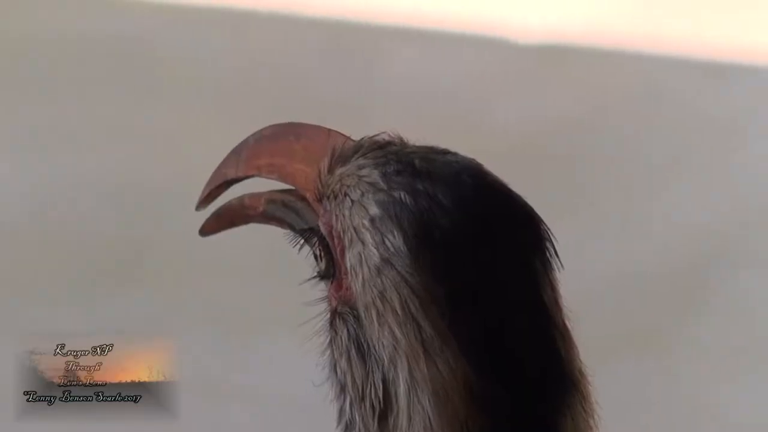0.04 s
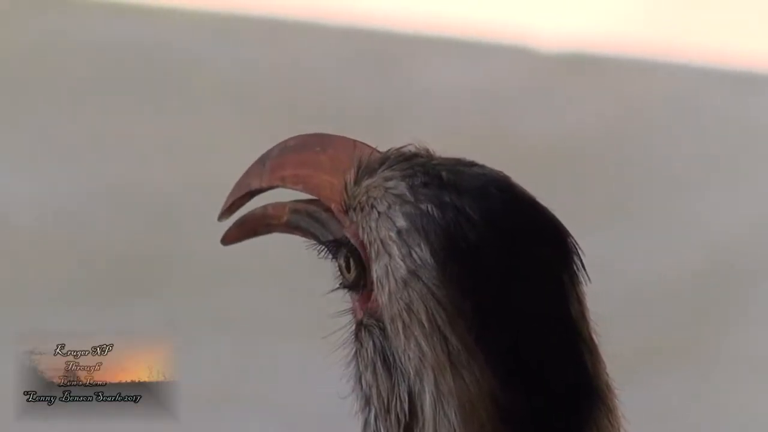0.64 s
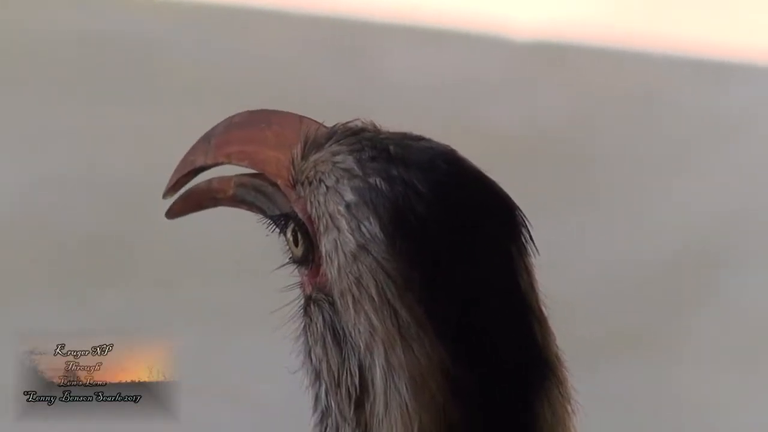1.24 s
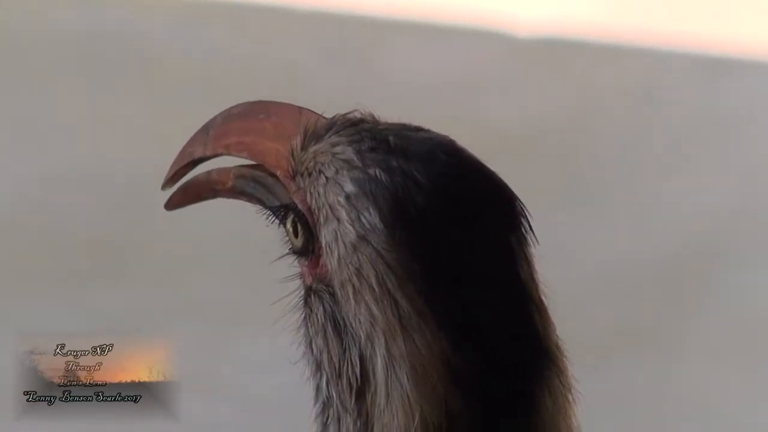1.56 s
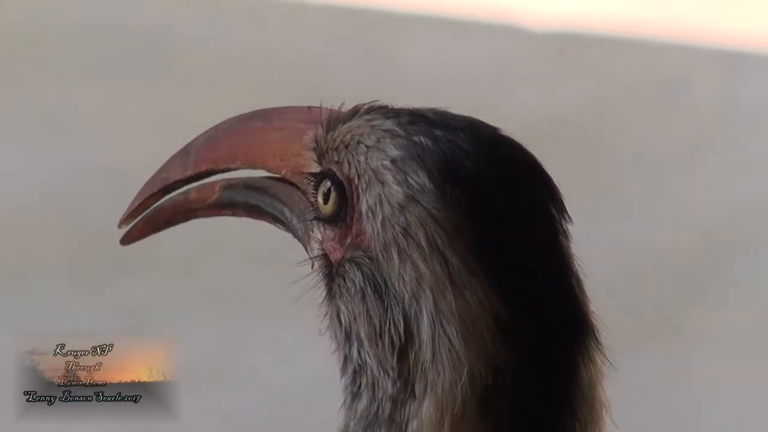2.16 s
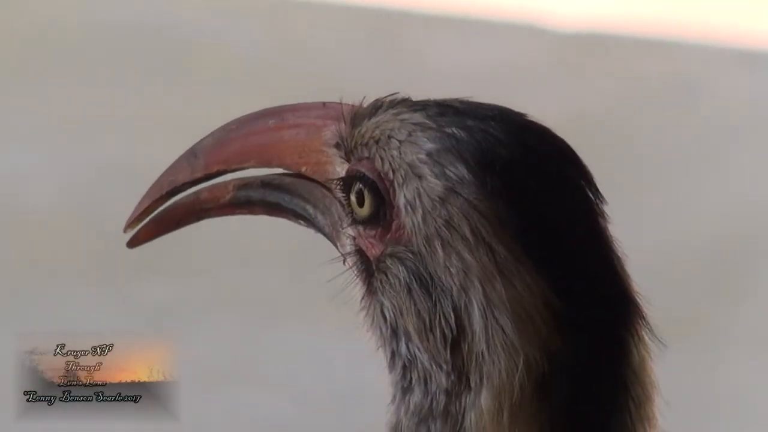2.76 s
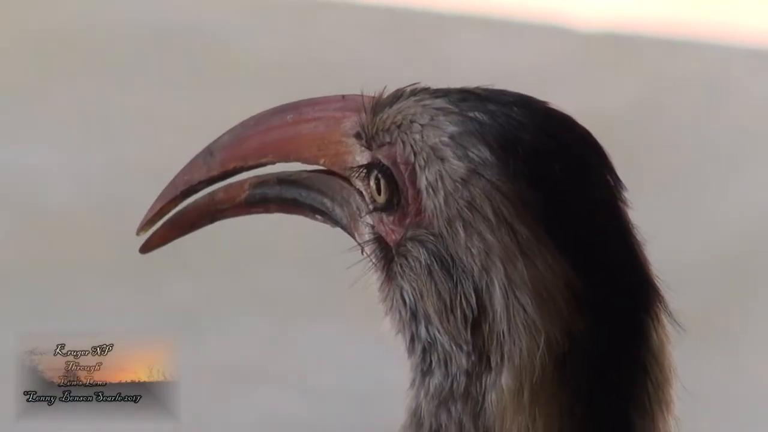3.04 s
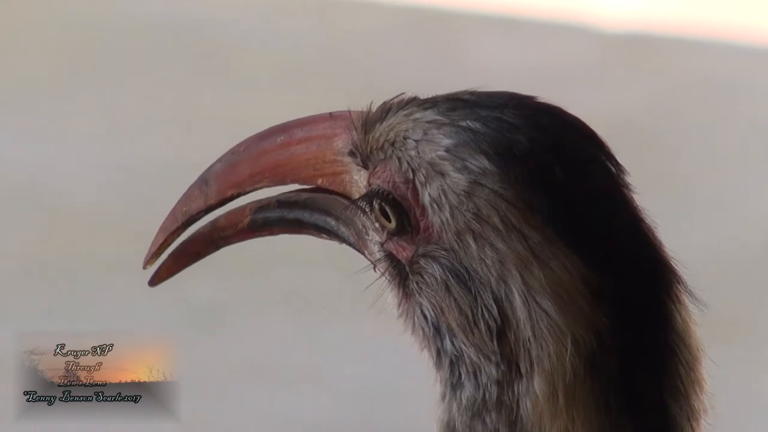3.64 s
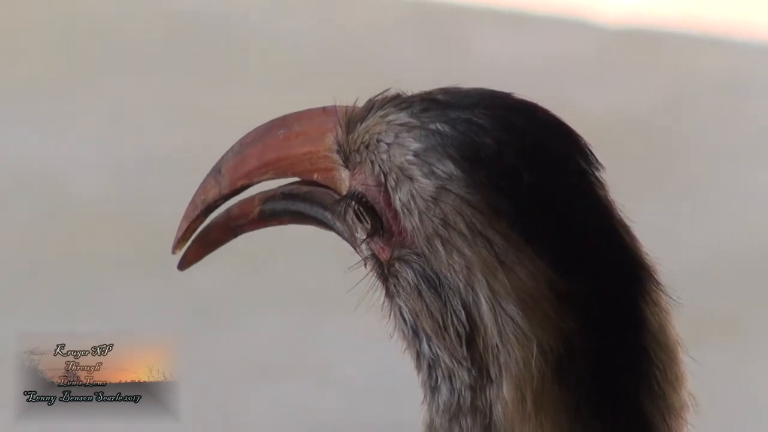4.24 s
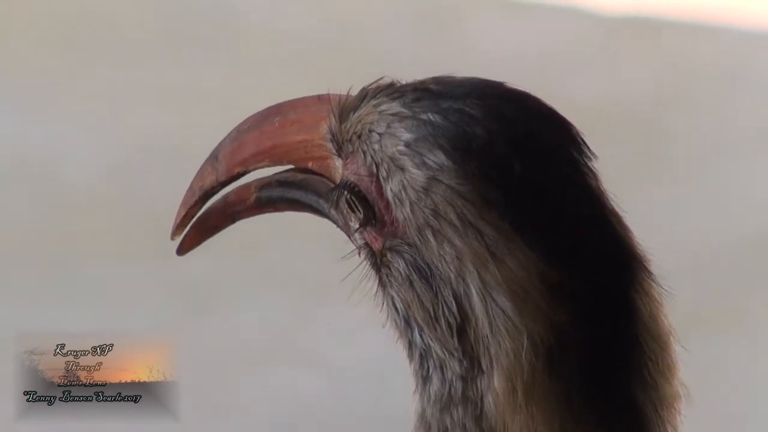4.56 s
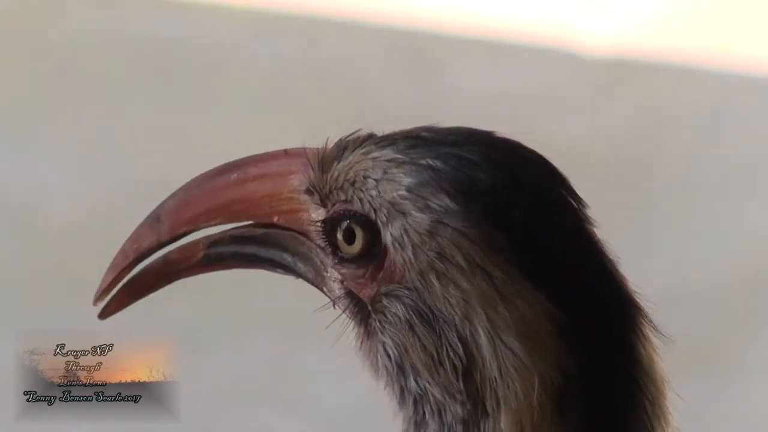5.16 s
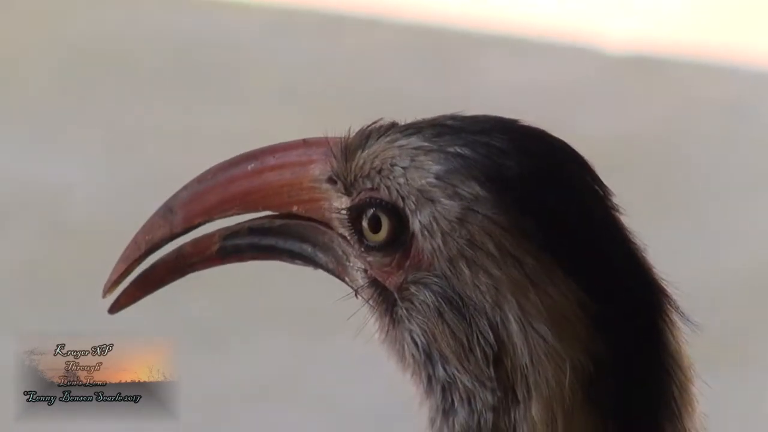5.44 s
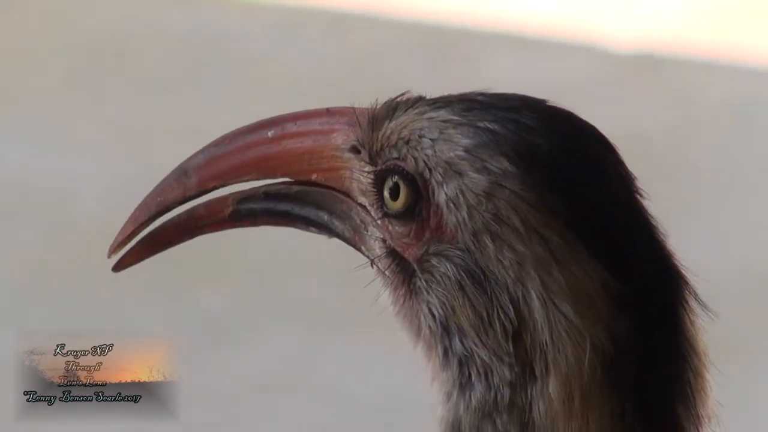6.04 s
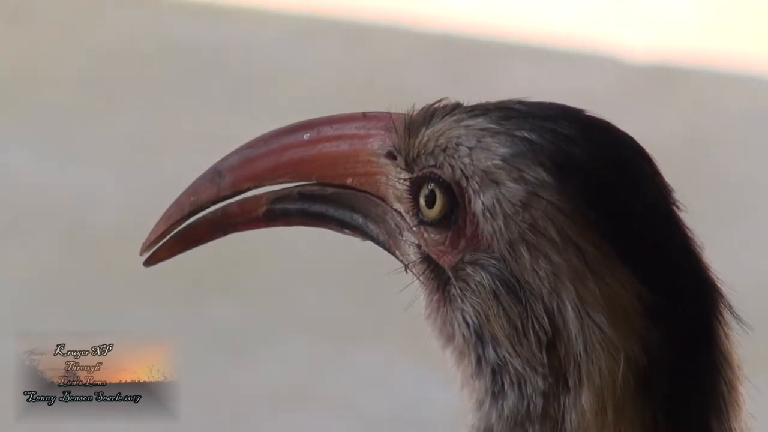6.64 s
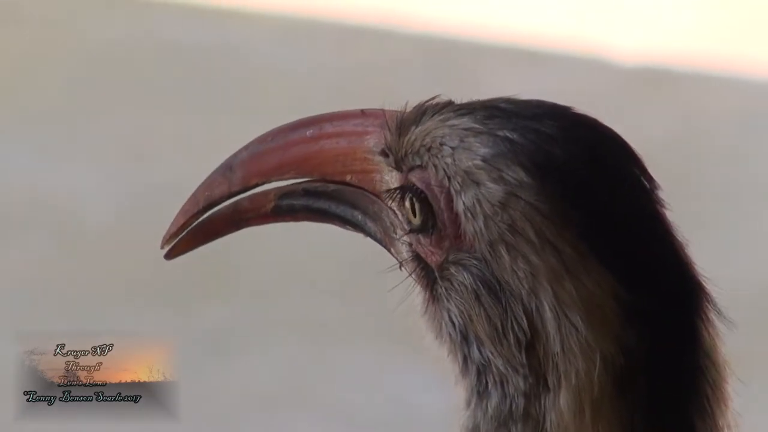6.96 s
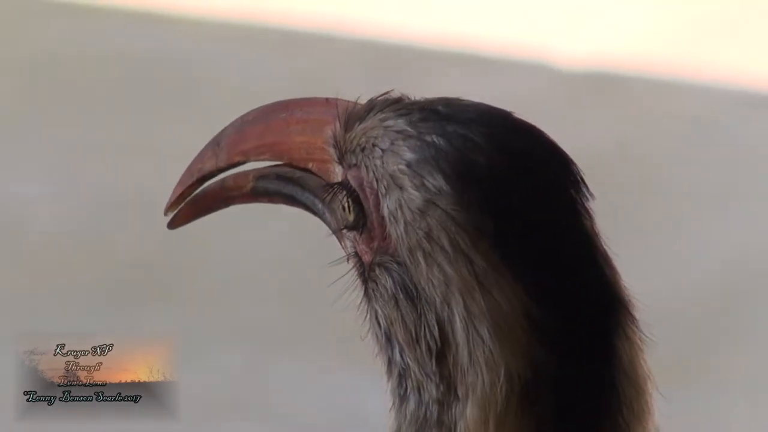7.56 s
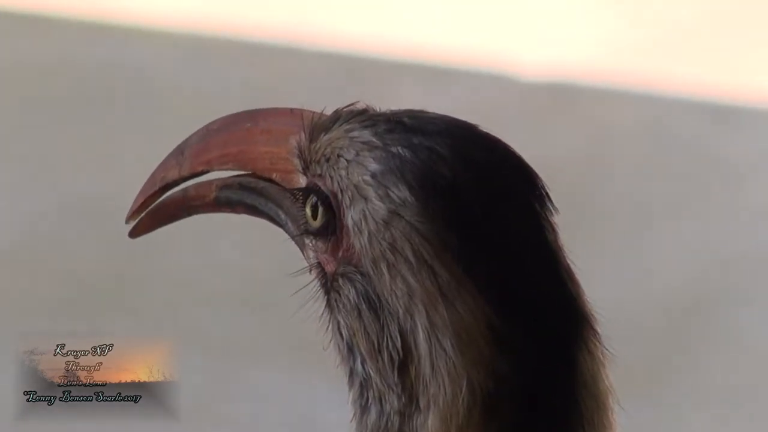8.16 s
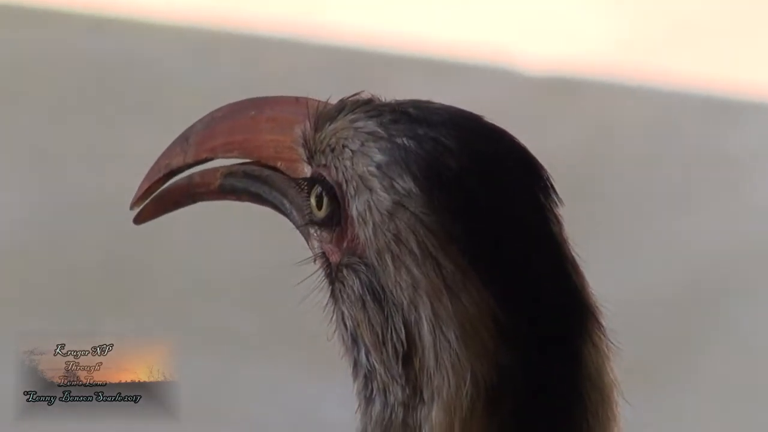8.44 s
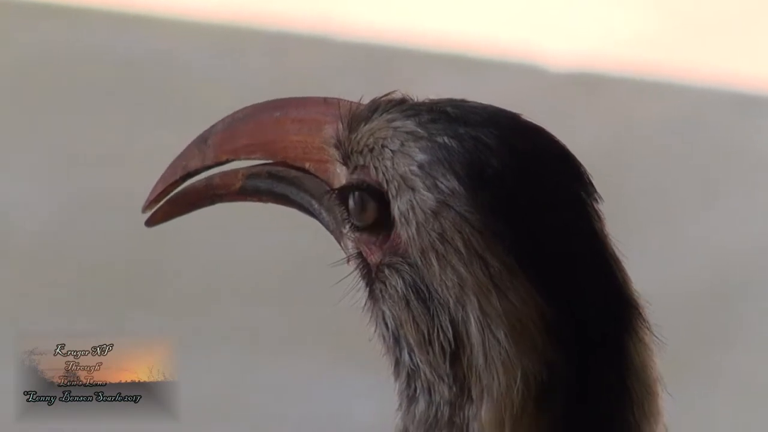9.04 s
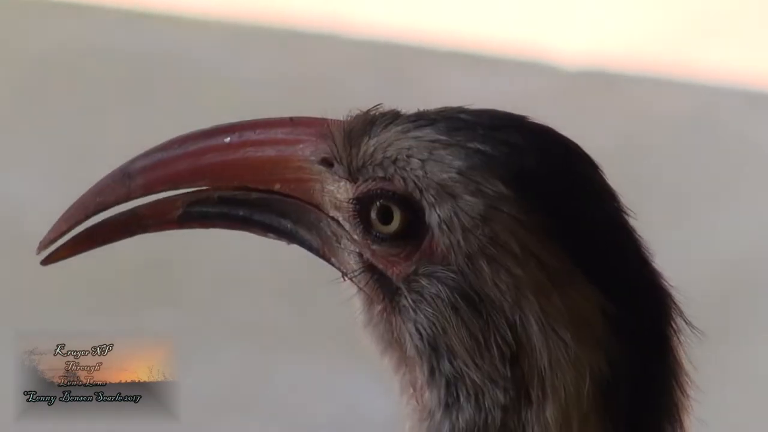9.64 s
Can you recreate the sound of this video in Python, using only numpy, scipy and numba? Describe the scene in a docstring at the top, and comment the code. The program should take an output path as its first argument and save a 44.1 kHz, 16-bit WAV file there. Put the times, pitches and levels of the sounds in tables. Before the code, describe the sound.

A long run of short, ringing clucks from a nearby hornbill quickens and sharpens, with faint chirps of small birds behind.

```python
"""Hornbill clucking on a veranda

A close hornbill clucks faster and more urgently as it goes on. Each cluck swells as its second
harmonic glides into the throat resonance, then breaks upward and fades; hard walls echo it and a
limiter flattens it. There is one soft grunt and one dry snap. Small birds chirp, chip and whistle
further off, over faint outdoor noise."""
import sys
import numpy as np
from scipy import signal
from scipy.fft import rfft, irfft
from scipy.io import wavfile
from scipy.ndimage import uniform_filter1d
from numba import njit

SR = 44100
rng = np.random.default_rng(int(sys.argv[2]) if len(sys.argv) > 2 else 0)


def output_pcm(signal):
    """Save a mono or channel-first signal as 16-bit PCM at the path in sys.argv[1].

    Samples are clipped to [-1, 1] before scaling.
    """
    pcm = np.clip(np.atleast_2d(signal).T, -1, 1) * 32767
    wavfile.write(sys.argv[1], SR, np.round(pcm).astype(np.int16))


N = 432621

# The run of clucks. Each row: start in seconds, swell length in seconds.
CLUCK_CUES = [(0.1096, 0.023), (0.7026, 0.026), (0.967, 0.028), (1.2117, 0.0272), (1.4532, 0.029),
              (1.712, 0.0297), (1.9453, 0.027), (2.1668, 0.029), (2.3823, 0.028), (2.5944, 0.028),
              (2.7926, 0.029), (2.9922, 0.029), (3.1828, 0.03), (3.3875, 0.03), (3.577, 0.03),
              (3.7618, 0.03), (3.955, 0.029), (4.141, 0.031), (4.31, 0.03), (4.4814, 0.035),
              (4.6647, 0.034), (4.8358, 0.034), (5.007, 0.031), (5.1752, 0.034), (5.343, 0.033),
              (5.5097, 0.033), (5.6765, 0.035), (5.8444, 0.033), (6.011, 0.033), (6.17, 0.034),
              (6.3349, 0.034), (6.5, 0.034), (6.6599, 0.037), (6.8285, 0.036), (6.993, 0.0309),
              (7.1543, 0.0327), (7.3134, 0.032), (7.4678, 0.034), (7.6263, 0.0329), (7.7836, 0.033),
              (7.944, 0.033), (8.1003, 0.033), (8.2578, 0.032), (8.4124, 0.035), (8.569, 0.035),
              (8.731, 0.03), (8.8796, 0.033), (9.0368, 0.031), (9.197, 0.034), (9.351, 0.034),
              (9.5076, 0.034), (9.6672, 0.031)]
# How the performance builds. Each row: time in seconds, urgency from 0 to 1, base pitch in Hz,
# drive into the throat in dB.
PERFORMANCE = [(0.1, 0, 630, -19.5), (0.7, 0, 622.5, -20.5), (1.0, 0.05, 617.3, -18.5),
               (1.95, 0.17, 613.3, -17.5), (2.2, 0.5, 618.5, -15.5), (3.6, 0.7, 623.4, -15.5),
               (4.1, 0.79, 614.8, -18), (4.6, 0.76, 621, -17), (5.5, 0.9, 625.7, -16.5),
               (6.4, 0.98, 630.3, -14.5), (7.3, 1, 623.4, -14), (8.3, 1, 619, -17.5), (8.8, 0.98, 621, -14),
               (9.7, 0.92, 622.4, -16)]
# The tone of the throat and open bill. Each row: centre in Hz, width in Hz, gain in dB.
THROAT_FORMANTS = [(722, 392, -19.5), (1243.7, 231, -3.5), (1715, 128, -16.5), (2422, 76, -27),
                   (3110, 570, -37), (5200, 2500, -53), (8330, 720, -49), (9510, 600, -44),
                   (13500, 3800, -59.5)]


def hornbill(scatter_hz=2.5, scatter_db=.5, throat_lag_s=.002):
    """Clucks from the syrinx, no two quite alike, are shaped by the throat and bill."""
    source = np.zeros(N)
    times, *curves = np.transpose(PERFORMANCE)
    for start, swell_s in CLUCK_CUES:
        urgency, pitch_hz, db = (np.interp(start, times, curve) for curve in curves)
        sharp, loud = rng.standard_normal(2)
        note = cluck(swell_s, pitch_hz + scatter_hz * sharp, urgency)
        add(source, start - throat_lag_s, undb(db + scatter_db * loud) * note)
    # the small bill radiates almost nothing below the fundamental
    low_cut = signal.butter(4, 500, "high", fs=SR, output="sos")
    return signal.sosfilt(low_cut, resonate(source, THROAT_FORMANTS))


# The pitch and loudness gestures of one cluck. Pairs run from calm to urgent.
GLIDE_HZ_PER_S, GLIDE_S = 1205, .021
LEAP_HZ, LEAP_S, SINK_S = (55.8, 136.1), 0.0059, (.03, 0.0182)
SWELL_DB, PUSH_DB = (6, 9), (4, 8)
SWELL_FROM_SHARE, SWELL_TO_SHARE = (.05, 0.3), (0.71, 0.5)
DROP_DB, FADE_DB_PER_S, TAIL_S = (7, 4), 329.5, 0.0457


def cluck(swell_s, pitch_hz, urgency, jitter=0.015, break_jitter=0.029, shimmer=0.52,
          rasp_db=-16, break_rasp_db=9):
    """A harmonic note glides, leaps and sinks; urgency brightens it and lifts and roughens the break."""
    t = clock(swell_s + TAIL_S)
    since_break = t - swell_s
    since_top = since_break - LEAP_S
    leap_width_s = np.where(since_top < 0, 1.074 * LEAP_S, blend(SINK_S, urgency))
    leap_hz = blend(LEAP_HZ, urgency) * np.exp(-(since_top / leap_width_s) ** 2)
    # the glide fills only the last part of the swell
    glide_hz = GLIDE_HZ_PER_S * (np.clip(since_break, -GLIDE_S, 0) + swell_s / 3)
    breaking = urgency ** 2 * np.exp(-(since_top / 0.013) ** 2)
    wobble = 1 + (jitter + break_jitter * breaking) * wander(t, 691.8)
    phase = phase_of((pitch_hz + glide_hz + leap_hz) * wobble)
    harmonics = np.arange(1, 24)[:, None]
    tilt_db_per_octave = -2.5 * (1.5 - urgency)
    voice = (undb(tilt_db_per_octave * np.log2(harmonics / 2)) * np.sin(harmonics * phase)).sum(axis=0)
    voice *= 1 + shimmer * breaking * wander(t, 1196.2)
    # air hisses through the syrinx once a cycle
    puffs = (1 + np.cos(phase)) * rng.standard_normal(8192)[:len(t)]
    rasp = undb(rasp_db + break_rasp_db * breaking) * puffs
    return (voice + rasp) * cluck_envelope(t, swell_s, urgency)


def cluck_envelope(t, swell_s, urgency):
    """The voice catches softly, swells, holds, drops at the break and fades."""
    rise_span = [blend(SWELL_FROM_SHARE, urgency), blend(SWELL_TO_SHARE, urgency)]
    risen = np.interp(t / swell_s, rise_span, [0, 1])
    db = blend(PUSH_DB, urgency) - blend(SWELL_DB, urgency) * (1 - risen)
    db -= blend(DROP_DB, urgency) * np.clip((t - swell_s) / LEAP_S, 0, 1)
    db -= FADE_DB_PER_S * np.maximum(t - swell_s - LEAP_S, 0)
    return undb(db) * np.clip(t / 0.00086, 0, 1) * np.clip((t[-1] - t) / 0.0034, 0, 1)


# Slaps off the nearby walls. Each row: delay in seconds, gain in dB, pan to the left in dB.
WALL_SLAPS = [(.0042, -23.5, -5), (0.0089, -15, 12.5), (.013, -19.5, -10.5), (0.0196, -17.5, 15),
              (0.0323, -26.5, -22), (.0383, -22, 13), (0.0518, -23, -7), (0.0682, -35, 0.5)]


def veranda(voice, ring_hz=1240, ring_t60_s=0.63, ring_db=-12, early_db=-27, late_db=-29):
    """Clucks arrive directly and off hard walls; their loud second harmonic lingers as a narrow tone."""
    direct = mic_pair(voice)
    pole = np.exp((2j * np.pi * ring_hz - np.log(1000) / ring_t60_s) / SR)
    ring = signal.lfilter([2 * (1 - abs(pole))], [1, -pole], voice).real
    out = direct + undb(ring_db) * ring
    for delay, db, left_db in WALL_SLAPS:
        add(out, delay, direct * undb(db) * pan(left_db))
    early = undb(early_db) * reverb(voice, t60_s=0.083, build_s=0.0092)
    late = undb(late_db) * reverb(voice, t60_s=0.93, build_s=0.074)
    return out + early + late


def grunt(start=0.397, pitch_hz=562, length_s=0.052, db=-37, tick_db=-30):
    """Two soft harmonics on a level pitch, with a small tick as the bill moves."""
    t, out = clock(length_s), np.zeros(N)
    phase = phase_of(pitch_hz * (1 + .004 * wander(t, 400)))
    tone = np.sin(2 * phase) + undb(-6) * np.sin(phase)
    add(out, start, undb(db) * tone * np.sin(np.pi * t / length_s))
    burst = rng.standard_normal(len(t)) * np.exp(-t / 0.0033)
    tick = resonate(burst, [(1940, 500, 10.0), (5000, 3000, -20)])
    add(out, start + 0.0097, undb(tick_db) * tick)
    return mic_pair(out)


# The bright colour of the snap. Each row: centre in Hz, width in Hz, gain in dB.
SNAP_RESONANCES = [(5350, 1400, -0.5), (7700, 3300, -19), (10800, 2100, -0.5), (14200, 2800, -9)]


def snap(start=4.6679, hit_db=-18.5, decay_s=.0007, wet_db=-15):
    """One dry tick, perhaps of the bill: a tiny noise burst rings high resonances."""
    t, hit = clock(.02), np.zeros(N)
    add(hit, start, undb(hit_db) * rng.standard_normal(len(t)) * np.exp(-t / decay_s))
    tick = resonate(hit, SNAP_RESONANCES)
    return (tick + undb(wet_db) * reverb(tick, t60_s=0.147, build_s=.002)) * pan(4.5)


# Harsh falling chirps. Each row: start in seconds, opening pitch in Hz, relative level in dB.
FALLING_CHIRPS = [(0.051, 4920, -40), (.576, 3770, -43), (0.841, 4900, -51), (1.245, 4850, -53.5),
                  (1.385, 4916, -39.5), (2.093, 4770, -55), (3.005, 4870, -44.5), (3.512, 4024, -43),
                  (4.156, 3960, -43.5), (4.929, 4860, -40.5), (5.563, 3946, -43.5), (6.092, 4890, -54),
                  (6.222, 4015, -41), (6.841, 4780, -42.5), (7.382, 3995, -41.5), (8.215, 4860, -42),
                  (8.994, 3752, -42.5), (9.659, 4290, -43.5)]
# Sharp, scratchy chips. Each row: start in seconds, opening pitch in Hz, relative level in dB.
SHARP_CHIPS = [(0.224, 7300, -48), (.745, 7400, -49.5), (1.756, 10000, -46.5), (2.835, 9500, -45.5),
               (3.39, 6800, -48), (3.588, 7300, -44), (3.826, 6500, -47), (3.997, 6400, -43),
               (4.028, 10500, -45.5), (4.039, 5200, -40.5), (4.058, 10500, -46), (4.092, 5200, -52),
               (8.535, 9000, -49.5)]
# Thin rising whistles. Each row: start in seconds, held pitch in Hz, relative level in dB.
THIN_WHISTLES = [(.69, 6900, -51), (.92, 6660, -57), (1.005, 6900, -55), (1.27, 7050, -50.5),
                 (1.649, 7080, -51), (2.3, 7000, -52.5), (2.705, 7080, -56), (3.242, 6980, -52.5),
                 (3.785, 6900, -52), (4.22, 7030, -53), (5.029, 7700, -53), (5.41, 6950, -56),
                 (5.739, 8200, -55.5), (5.92, 6960, -57.5)]


def small_birds(direct_db=-5, wet_db=-2, chip_db=2.5, whistle_wet_db=-6):
    """Distant birds, heard mostly by their reflections; the whistler is in clearer view."""
    song, whistles = np.zeros((2, N))
    for start, start_hz, db in FALLING_CHIRPS:
        add(song, start, undb(db) * chirp(start_hz))
    for start, start_hz, db in SHARP_CHIPS:
        add(song, start, undb(db + chip_db) * chip(start_hz))
    for start, hz, db in THIN_WHISTLES:
        add(whistles, start, undb(db) * whistle(hz))
    song += chatter()
    send = undb(wet_db) * song + undb(whistle_wet_db) * whistles
    wet = reverb(send, t60_s=0.43, build_s=0.012)
    return undb(direct_db) * (song + whistles) * pan(2.8) + wet * pan(1.6)


def chirp(start_hz, toward_hz=2890, fall_share=.72, buzz_hz=230, buzz_depth=.055, rough=.048, grain=.7):
    """Both sides of the syrinx slide down together, shaken by a fast, uneven buzz."""
    length_s = 420 / start_hz  # higher chirps are shorter
    t = clock(length_s)
    progress = t / length_s
    buzz = np.sin(phase_of(buzz_hz * (1 + .2 * wander(t, 150))))
    fall_hz = fall_share * (start_hz - toward_hz) * progress ** .8
    hz = (start_hz - fall_hz) * (1 + buzz_depth * buzz)
    main, low, high = (np.sin(phase_of(hz * ratio * (1 + rough * wander(t, 1800))))
                       for ratio in (1, .8, 1.22))
    # the lower voice joins late; an upper sideband sounds once it is low enough to pass the throat
    low *= 0.91 * np.minimum(progress / .55, 1)
    high *= 0.41 * np.clip((4100 - hz) / 500, 0, 1)
    envelope = np.interp(progress, [0, .15, .8, 1], [0.18, 1.18, 0.86, 1.1])
    flutter = (1 + grain * buzz) * undb(2 * wander(t, 200))
    return (main + low + high) * envelope * flutter


def chip(start_hz, end_hz=3860, length_s=0.018, rough=0.22, fade_db=-2):
    """A very fast, scratchy downward sweep that starts abruptly."""
    t = clock(length_s)
    progress = t / length_s
    hz = start_hz * (end_hz / start_hz) ** progress * (1 + rough * wander(t, 4000))
    return np.sin(phase_of(hz)) * np.sqrt(np.sin(np.pi * progress)) * undb(fade_db * progress)


def whistle(pitch_hz, length_s=0.067, rise=0.11):
    """A held thin note that flicks up at its end."""
    t = clock(length_s)
    flick = np.clip((t / length_s - .55) / 0.27, 0, 1)
    hz = pitch_hz * (1 + rise * flick + 0.009 * wander(t, 450))
    return np.sin(phase_of(hz)) * np.sin(np.pi * t / length_s) ** 1.5


def chatter(centre_hz=4210, spread=.12, typical_db=-59, count=20):
    """The rest of the flock chirps faintly at random moments."""
    out = np.zeros(N)
    for when, high, loud in rng.random((count, 3)):
        start_hz = centre_hz * (1 + spread * (2 * high - 1))
        add(out, when * N / SR, undb(typical_db) * (.5 + loud) * chirp(start_hz))
    return out


# The colour of the outdoor bed. Each row: frequency in Hz, relative noise density in dB.
AIR_SPECTRUM = [(25, -18.5), (60, -8.5), (110, -3.5), (200, -3), (330, 3.5), (480, 0.5), (800, 4.5),
                (1600, -3.5), (3200, -4), (5000, -5), (7000, -10), (10000, -12), (15500, -16.5)]


def outdoor_air(mid_db=-57, half_width_hz=250, drift_db=-0.5):
    """Soft far-off noise, alike in both ears in the bass and wide above."""
    f = np.arange(N // 2 + 1) * SR / N + 1
    hz, db = np.transpose(AIR_SPECTRUM)
    colour = undb(np.interp(np.log(f), np.log(hz), db))
    mid_bins, side_bins = rfft(rng.standard_normal((2, N))) * colour
    mid = irfft(mid_bins, N)
    side = irfft(side_bins * f / (f + half_width_hz), N)
    level = undb(mid_db + drift_db * wander(np.arange(N) / SR, 3.2))
    return np.array([mid + side, mid - side]) / mid.std() * level


def resonate(x, modes, size=4096):
    """Causal filter with a steep-sided peak for each (centre Hz, width Hz, gain dB)."""
    f = np.arange(size // 2 + 1) * SR / size
    gain = sum(undb(db) / (1 + (2 * (f - hz) / width) ** 2) for hz, width, db in modes)
    # folding the cepstrum gives minimum phase: nothing rings before the sound
    cepstrum = irfft(np.log(gain))
    cepstrum[1:size // 2] *= 2
    cepstrum[size // 2 + 1:] = 0
    impulse = irfft(np.exp(rfft(cepstrum)))
    return signal.oaconvolve(x, impulse)[:len(x)]


def reverb(x, t60_s, build_s):
    """Diffuse reflections that build up and die away, unrelated left and right."""
    t = clock(0.97)
    envelope = np.exp(-np.log(1000) * t / t60_s) * (1 - np.exp(-t / build_s))
    tail = rng.standard_normal((2, len(t))) * envelope
    tail /= np.sqrt(np.sum(tail ** 2, axis=1, keepdims=True))
    return signal.oaconvolve(x[None], tail, axes=1)[:, :N]


def mic_pair(x, lag_s=0.00013, left_db=0.65):
    """A source a little to the left reaches the right microphone port later and weaker."""
    delay = np.exp(-2j * np.pi * np.arange(N // 2 + 1) * SR / N * lag_s)
    return np.array([x, irfft(rfft(x) * delay, N)]) * pan(left_db)


def pan(left_db):
    """Left and right gains for a level difference."""
    return undb(np.array([[left_db], [-left_db]]) / 2)


def blend(pair, urgency):
    """A value between its calm and its urgent setting."""
    return pair[0] + urgency * (pair[1] - pair[0])


def wander(t, rate):
    """Smooth random motion with about unit spread."""
    return np.interp(t * rate, np.arange(4096), rng.standard_normal(4096))


def phase_of(hz):
    """Running phase of a moving pitch, in radians."""
    return 2 * np.pi * np.cumsum(hz) / SR


def undb(db):
    """Decibels to gain."""
    return 10 ** (np.asarray(db) / 20)


def clock(length_s):
    """Sample times of a short sound."""
    return np.arange(int(length_s * SR)) / SR


def add(out, start, sound):
    """Mix a sound in at a time in seconds."""
    i = max(int(start * SR), 0)
    part = out[..., i:i + sound.shape[-1]]
    part += sound[..., :part.shape[-1]]


def scene():
    """The hornbill up front on its veranda, small birds and open air behind."""
    return veranda(hornbill()) + grunt() + small_birds() + snap() + outdoor_air()


@njit
def follow_peaks(x, release):
    """Envelope that jumps to each peak and sinks slowly."""
    out, level = np.empty(len(x)), 0.
    for i in range(len(x)):
        level = max(x[i], level * release)
        out[i] = level
    return out


def record(dry, ceiling_db=-11.0, release_s=0.57, skew=0.047, top_hz=15900):
    """A limiter holds the peaks, the input stage is slightly lopsided, and the top is cut."""
    peak = follow_peaks(np.abs(dry).max(axis=0), np.exp(-1 / (release_s * SR)))
    gain = np.minimum(1, undb(ceiling_db) / (peak + 1e-9))
    held = dry * uniform_filter1d(gain, size=48)
    lopsided = held + skew * held ** 2
    centred = signal.sosfilt(signal.butter(1, 25, "high", fs=SR, output="sos"), lopsided)
    return signal.sosfilt(signal.ellip(8, .2, 70, top_hz, fs=SR, output="sos"), centred)


dry = scene()
out = record(dry)
output_pcm(out)
```